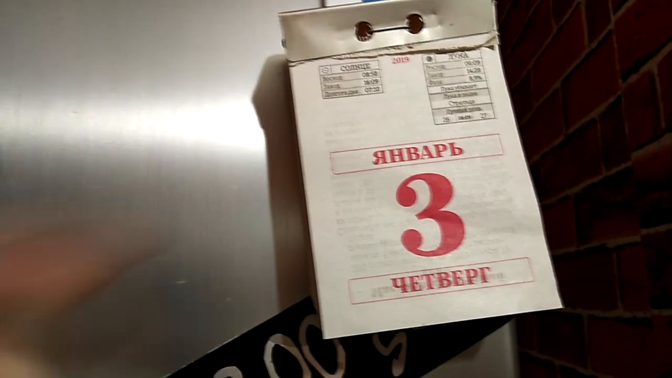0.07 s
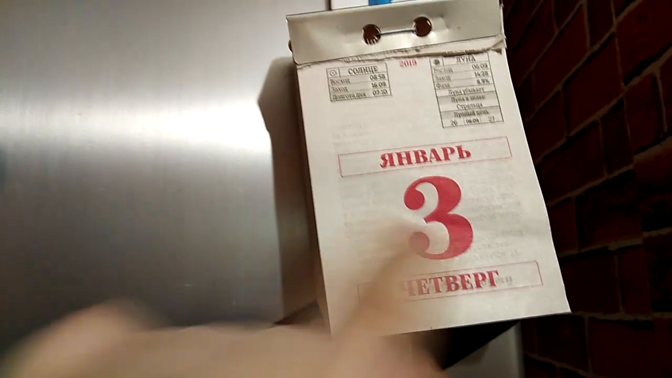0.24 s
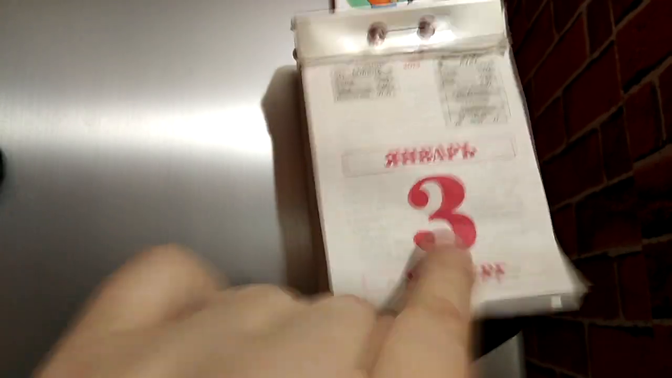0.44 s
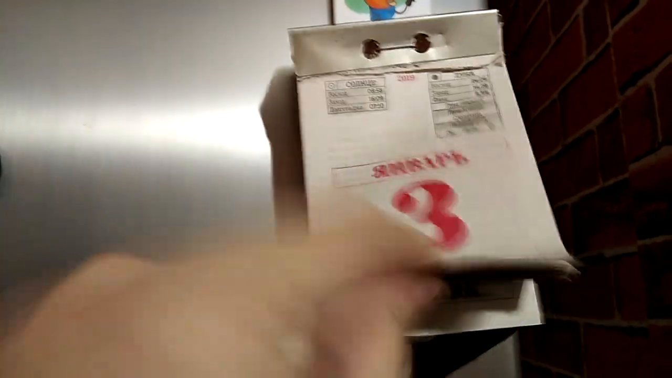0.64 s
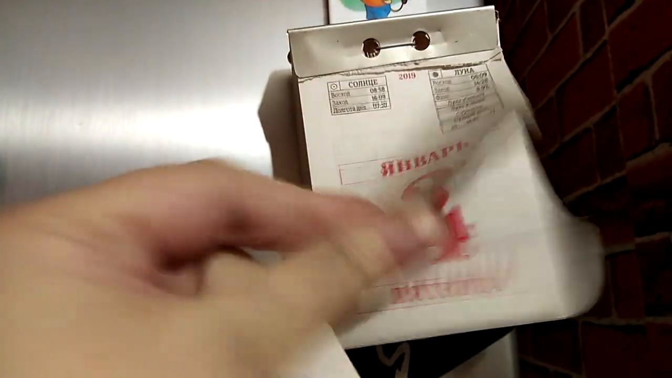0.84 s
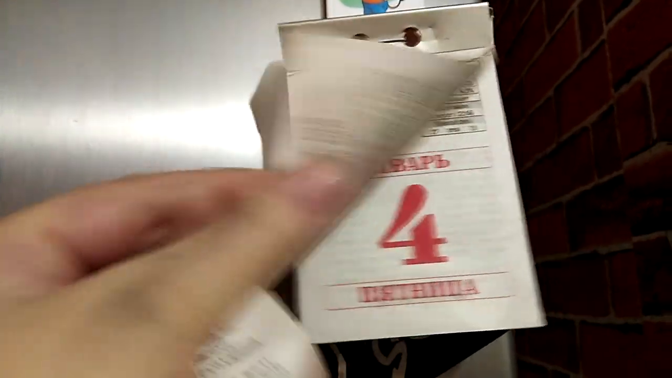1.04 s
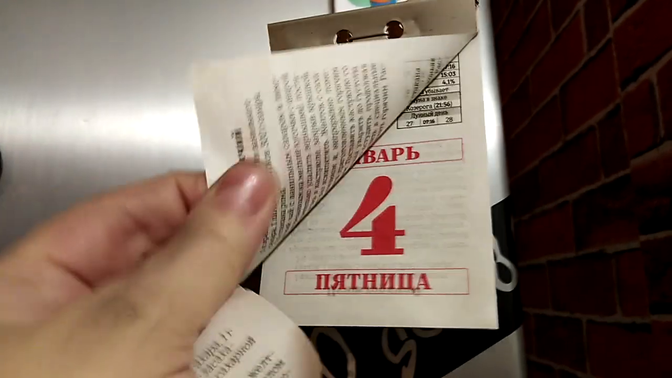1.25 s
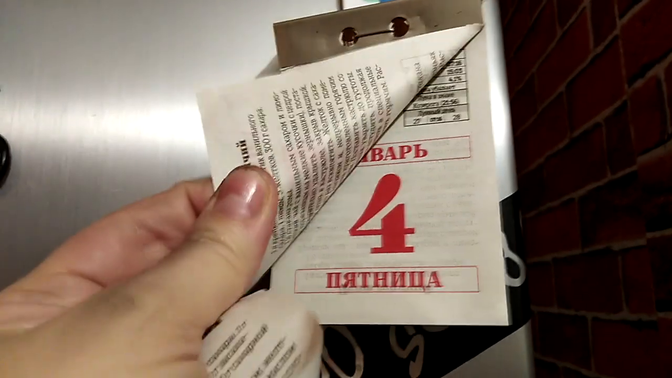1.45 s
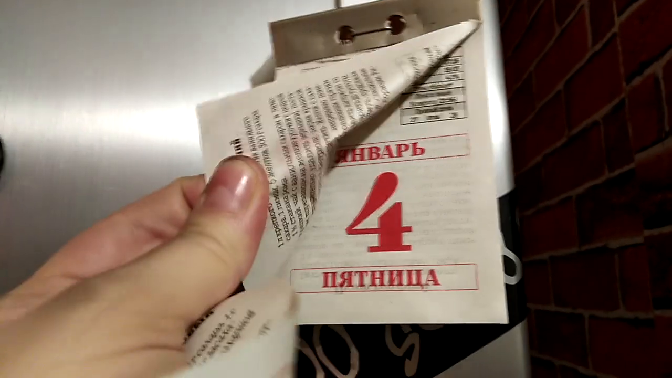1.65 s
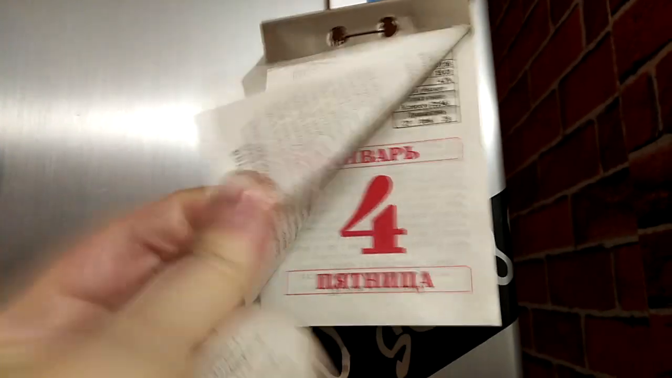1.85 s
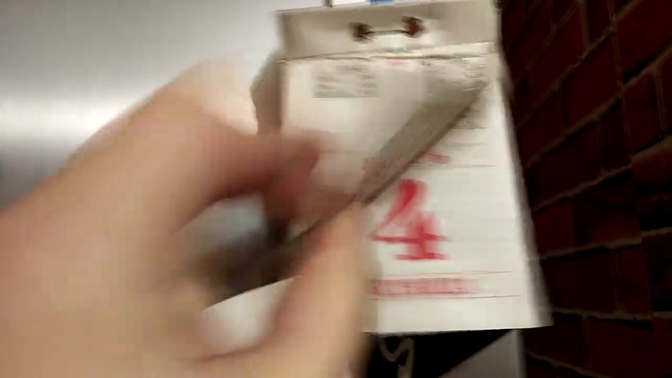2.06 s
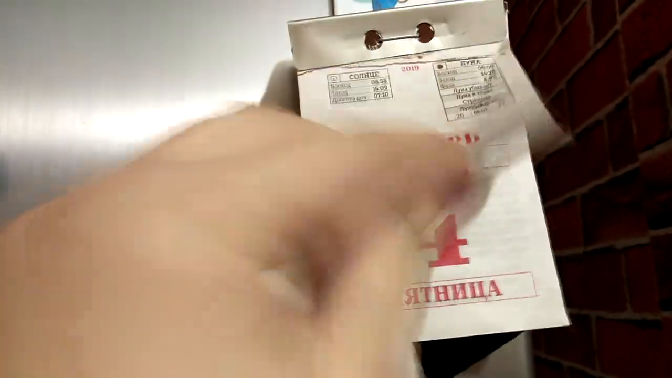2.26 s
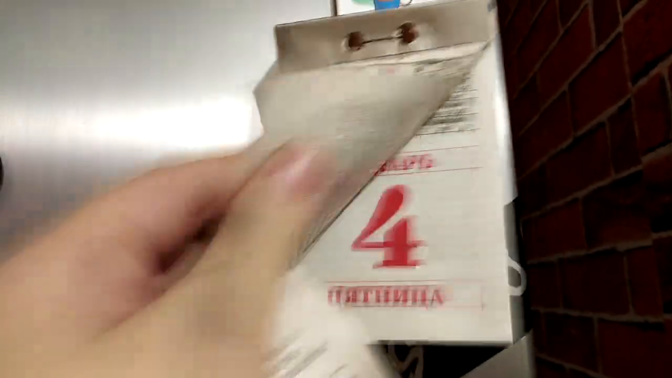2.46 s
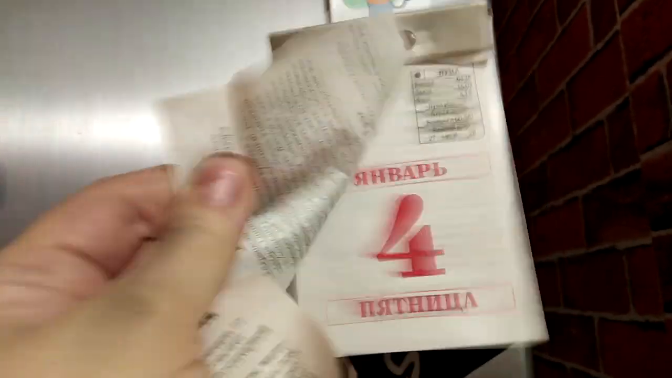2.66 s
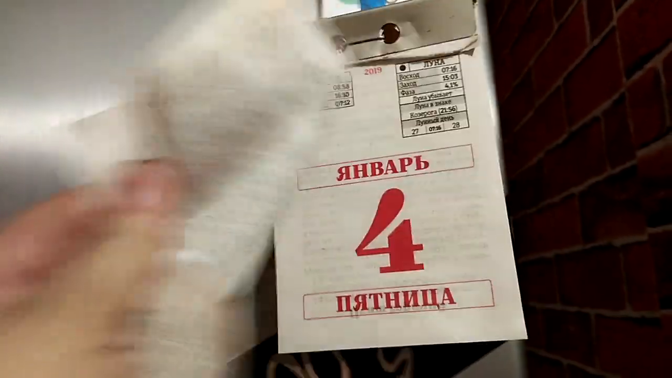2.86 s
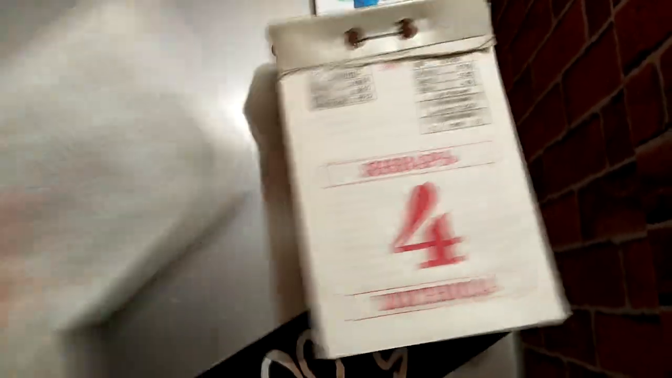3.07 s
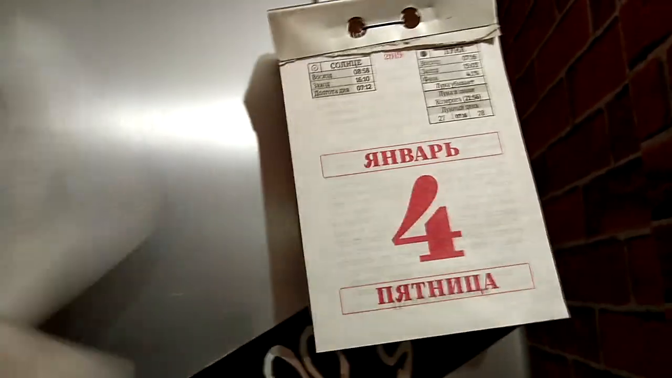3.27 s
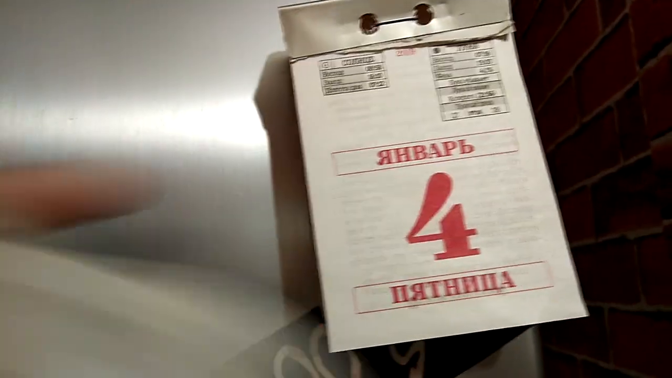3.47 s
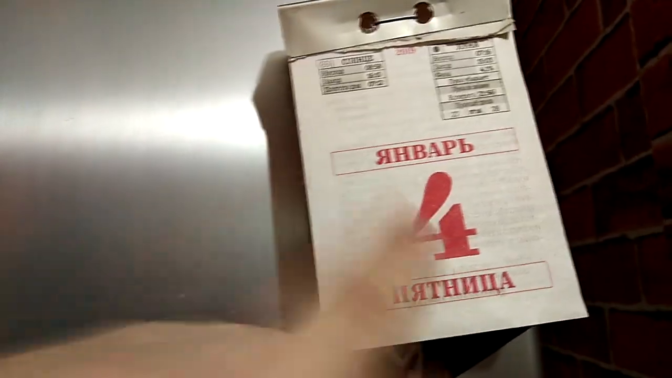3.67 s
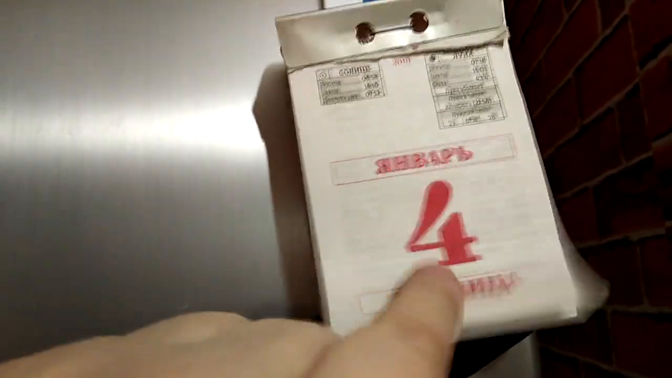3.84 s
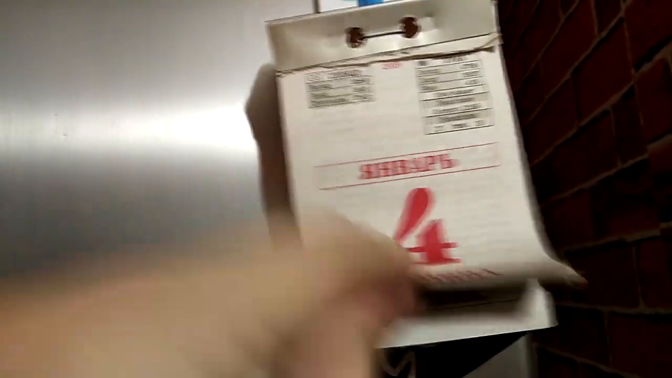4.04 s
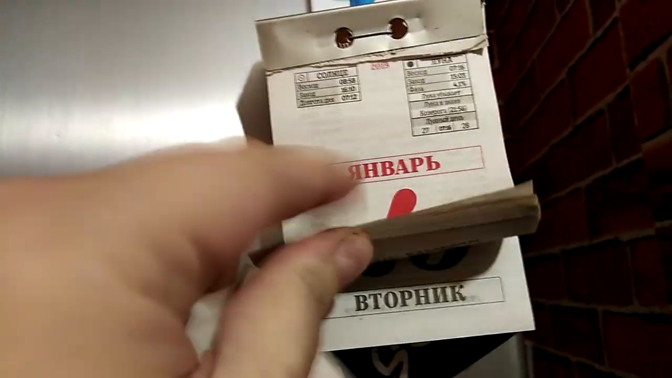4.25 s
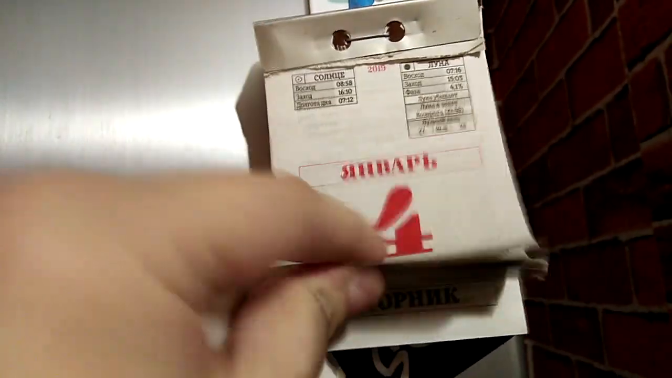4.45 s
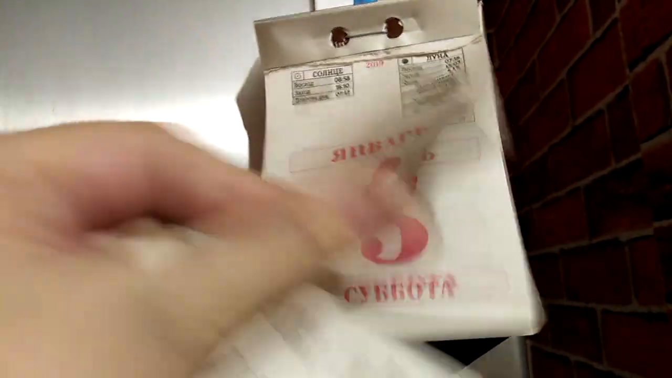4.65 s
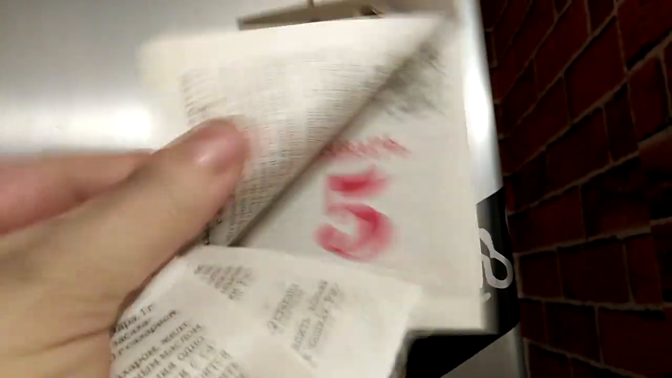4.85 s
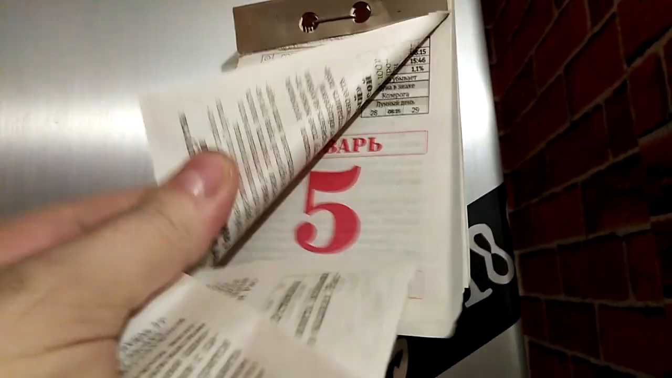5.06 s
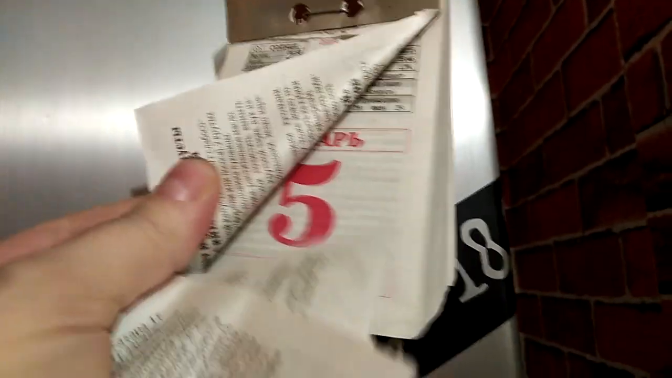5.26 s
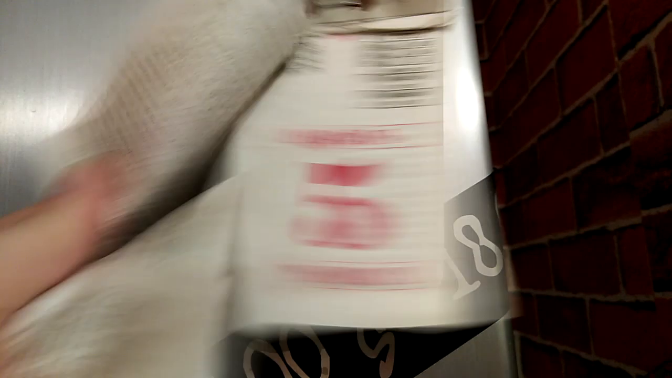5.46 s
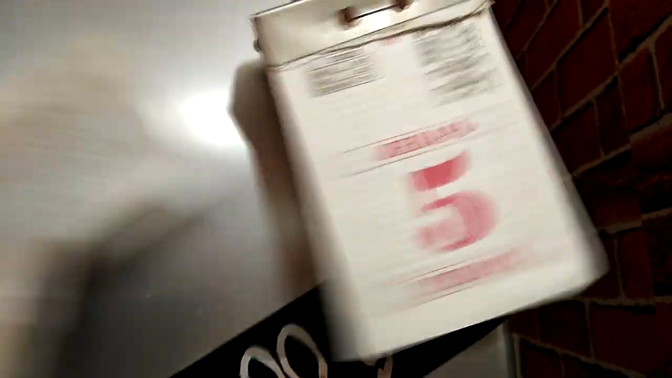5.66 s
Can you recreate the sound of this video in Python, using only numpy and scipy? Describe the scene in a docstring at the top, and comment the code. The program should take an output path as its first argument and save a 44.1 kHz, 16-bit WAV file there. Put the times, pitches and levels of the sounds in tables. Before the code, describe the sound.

A small tear-off calendar pad is handled very close to the microphone in a small, dry room. At 0 s a freed sheet flaps with a sharp snap, then fingers brush and scrape the paper until 0.9 s, with a soft low bump at 0.5 s. From 1 to 2.5 s come sparse grainy rubs and little crinkles, with brighter pops near 1.9 s. At 2.6 s a page rips abruptly, starting with a bright crack and thump and tearing on in crackling bursts to about 3.05 s. From 3.1 to 4 s the paper swishes and rustles; light rubs and ticks follow, then denser, louder rustling at 4.4-4.9 s with a dull bump. After a quieter moment, a second quick rip crackles at 5.35-5.55 s, followed by two short closing rubs to 5.7 s. A faint low metal-panel resonance follows the paper over very quiet bassy ambience.

```python
"""Close to the microphone in a small room, pages come off a small tear-off wall calendar.
A freed sheet flaps and snaps; then fingers rub over the pad (grainy noise) and bump it (low thuds).
From 2.6 s a page rips along the binding, fibre bundle by fibre bundle (bursts of tiny ruptures that shake
the loose sheet); rubbing and buckling snaps (ringing cracks) go on until a second rip at 5.4 s and
two last strokes. A steel panel hums along, over a faint ambience."""
import sys
import numpy as np
from scipy import signal
from scipy.fft import rfft, irfft, next_fast_len
from scipy.io import wavfile
from scipy.ndimage import uniform_filter1d, map_coordinates

SR = 44100
rng = np.random.default_rng(int(sys.argv[2]) if len(sys.argv) > 2 else 0)


def bounce(signal):
    """Save signal as a 16-bit WAV file at the path given by the first command-line argument."""
    frames = np.transpose(np.atleast_2d(signal))
    limited = np.clip(frames, -1, 1)
    pcm = np.round(limited * 32767).astype(np.int16)
    wavfile.write(sys.argv[1], SR, pcm)


N = 251934

# Strokes of fingers and sheets. Each row: start and end in seconds, relative level in dB,
# swell over the stroke in dB, pressure 0-1, grit 0-1.
STROKES = [(0, 0.095, -41, 4, 0.35, 0.67), (0.13, 0.234, -55.5, -12, 0.4, 0.9),
           (0.367, 0.469, -46, 8.5, 0.39, 0), (0.501, 0.563, -42, -8, 0.88, 0.98),
           (0.57, 0.859, -40.5, -7.5, 0.52, 0.47), (0.9, 0.971, -45.5, -1, 0.14, 0.79),
           (0.995, 1.032, -43, 8.5, 0.45, 0), (1.174, 1.246, -44.5, 2, 0, .1),
           (1.288, 1.332, -43, 10, 0.65, 0.55), (1.438, 1.511, -46.5, -7, 0.62, 0.6),
           (1.539, 1.661, -53, -19.5, 0.95, 0.83), (1.842, 1.878, -41.5, -13, 0.81, 0.99),
           (1.953, 2.101, -38, 7, 0.36, 0.72), (2.13, 2.163, -43.5, -0.5, 0.75, 0.5),
           (2.183, 2.262, -36.5, 3.5, 0.07, 0.48), (2.285, 2.503, -53, -31, 0.79, 0.84),
           (2.485, 2.619, -41.5, 3.5, 0.73, 0), (2.689, 2.764, -35, -8, 0.86, 0.93),
           (3.121, 3.249, -40.5, -6.5, 0.44, 0.78), (3.255, 3.363, -39, -4.5, 0.55, 0.3),
           (3.37, 3.46, -35.5, -11.5, 0.3, 0.36), (3.47, 3.565, -48.5, 7, 0.6, 1),
           (3.6, 3.7, -36.5, 11, 0.5, 0.8), (3.725, 3.876, -40, 4, 0.45, 0.64),
           (3.862, 3.988, -51, -7, 0.46, 0.38), (3.992, 4.061, -41, 1, 0.66, 0),
           (4.153, 4.192, -41.5, 14.5, 0.99, 0.9), (4.208, 4.305, -53.5, -2, 0, 0.3),
           (4.395, 4.519, -37.5, 0.5, 0.54, 0.3), (4.521, 4.643, -34, 5, 0.28, 0.79),
           (4.692, 4.777, -35.5, 9, 0.4, 0.7), (4.816, 4.864, -36.5, 8.5, 0.64, 0.54),
           (4.894, 4.957, -46, -24, 0.62, 0.9), (4.989, 5.157, -46.5, -12.5, 0.43, 0.96),
           (5.248, 5.299, -45.5, 12, 0.32, 1), (5.546, 5.613, -36.5, -7, 0.58, 0.7),
           (5.644, 5.708, -42, -1.5, 0.3, 0.99)]


def amp(db):
    """Decibels to gain."""
    return 10 ** (np.asarray(db) / 20)


def unit(x):
    """Scale to rms 1."""
    return x / np.sqrt(np.mean(x ** 2) + 1e-20)


def along(points, hz):
    """(Hz, value) points read on a log frequency axis."""
    f, v = np.transpose(points)
    return np.interp(np.log(hz + 1), np.log(f), v)


def wobble(rate):
    """A smooth random curve, rate knots a second."""
    knots = rng.standard_normal(int(N * rate / SR) + 4)
    return map_coordinates(knots, [np.arange(N) * rate / SR])


def filtered(x, response):
    """x times a response of frequency."""
    n = x.shape[-1]
    padded = next_fast_len(n + 2048)
    hz = np.fft.rfftfreq(padded, 1 / SR)
    return irfft(rfft(x, padded) * response(hz), padded)[..., :n]


def colour(x, points):
    """x through a (Hz, dB) spectrum, at rms 1."""
    return unit(filtered(x, lambda hz: amp(along(points, hz))))


def ring(x, modes):
    """x through (Hz, width in Hz, dB) resonances, at rms 1."""
    def response(f):
        return sum(amp(db) * 1j * f * width / (centre ** 2 - f * f + 1j * f * width)
                   for centre, width, db in modes)
    return unit(filtered(x, response))


def noise(n):
    """White noise at the two ports, whose likeness depends on frequency: greatest in the bass."""
    # How alike the ports hear it. Each row: frequency in Hz, correlation 0-1.
    likeness = [(100, 0.73), (400, 0.88), (1300, 0.61), (2500, 0.26), (4000, 0.057), (7000, 0.17),
                (14000, 0.4)]

    def mid_and_side(hz):
        turn = np.arccos(np.clip(along(likeness, hz), -1, 1)) / 2
        return np.array([np.cos(turn), np.sin(turn)])

    mid, side = filtered(rng.standard_normal((2, n)), mid_and_side)
    return np.array([mid + side, mid - side])


def grains(rate, spread_db, life):
    """Envelope of tiny ruptures, rate a second: sudden rise, quick fall of power over life s, uneven sizes."""
    size = amp(spread_db * np.clip(rng.standard_normal(N), -2, 2))
    struck = (rng.random(N) < rate / SR) * size ** 2
    power = signal.lfilter([1], [1, -np.exp(-1 / (life * SR))], struck)
    # tension released by one rupture is missing from its neighbours
    supply = np.abs(uniform_filter1d(power, size=1100)) + power.mean() / 10
    return unit(np.sqrt(power / supply))


def add(track, s, sound):
    """Mix a sound in at time s."""
    span = track[:, max(0, round(s * SR)):][:, :sound.shape[-1]]
    span += sound[:, :span.shape[-1]]


def bent(x, depth_db):
    """As the sheet bends, the frequencies it favours keep shifting."""
    bends_per_s = 22
    hz, t, z = signal.stft(x, SR, nperseg=256)
    knots = np.clip(rng.standard_normal((32, int(t[-1] * bends_per_s) + 2)), -2, 2)
    band = 7 * np.log2(1 + hz / 1200)  # finer steps in the bass
    field = map_coordinates(knots, np.meshgrid(band, t * bends_per_s, indexing='ij'))
    return signal.istft(z * amp(depth_db * field), SR, nperseg=256)[1][:, :x.shape[-1]]


def sliding():
    """Pressure sets the colour of a stroke; smooth ones hiss finely, gritty ones catch and let go."""
    # Spectra of the three voices of rubbing. Each row: frequency in Hz, relative level in dB.
    hiss_spectrum = [(1500, -13), (3200, -8), (4600, -8), (5700, -2), (7200, -2.5), (8600, -7.5),
                     (10800, -5.5), (12500, -9.5), (14500, -17.5)]
    rustle_spectrum = [(600, -18.5), (1300, 4), (1750, 4.5), (2250, 7.5), (3000, 0.5), (3700, 0),
                       (4600, 0.5), (7000, -27)]
    scrape_spectrum = [(35, -32.5), (90, 1.5), (250, -7), (420, -15), (650, -6.5), (900, 2.5), (1400, -4),
                       (2200, -10), (5000, -42)]
    # A light touch only hisses, a firm one rustles, a hard one scrapes the pad.
    # Each row: pressure 0-1, then hiss, rustle and scrape, relative levels in dB.
    touch = [(0, -2.5, -15.5, -25), (.6, -6, -2, -15), (1, -14, -15, 0)]
    # Pitch of the rustle over time. Each row: time in seconds, ratio to its usual spectrum.
    rustle_pitch = [(.45, 0.98), (.6, 1.36), (1.48, 1.7), (1.6, 0.78), (1.999, 1.35), (3.4, 1), (3.7, 0.86),
                    (4.1, 1.06), (4.45, 1.44), (4.74, 1.5), (4.84, 1.05)]
    attack_s, release_s = 0.015, 0.0061  # the fall straddles the end and lasts 1.5 release_s

    out, t = np.zeros((2, N)), np.arange(N) / SR
    fine = grains(rate=2400, spread_db=-2.5, life=0.00065)
    catches = grains(rate=240, spread_db=9.5, life=0.0018)
    hissing, scraping = colour(noise(N), hiss_spectrum), colour(noise(N), scrape_spectrum)
    rustling = noise(N)
    creaks = grains(rate=150, spread_db=5.5, life=.0014)
    waver_db = 1 * wobble(rate=35)  # the hand never moves quite evenly
    pressures, hiss_db, rustle_db, scrape_db = np.transpose(touch)
    for start, end, db, swell_db, pressure, grit in STROKES:
        edges = [start - attack_s / 2, start + attack_s / 2, end - release_s / 2, end + release_s]
        on = slice(max(0, int(edges[0] * SR)), int(edges[-1] * SR))
        progress = (t[on] - start) / (end - start)
        level_db = db + swell_db * (progress - .5) + waver_db[on]
        speed = np.interp(t[on], edges, [0, 1, 1, 0]) * amp(level_db)
        share = np.clip(grit, 0, 1) ** 2
        friction = np.sqrt((1 - share) * fine[on] ** 2 + share * catches[on] ** 2)
        ratio = np.interp((start + end) / 2, *np.transpose(rustle_pitch))
        shifted = [(hz * ratio, v) for hz, v in rustle_spectrum]
        hiss = amp(np.interp(pressure, pressures, hiss_db)) * hissing[:, on]
        rustle = amp(np.interp(pressure, pressures, rustle_db)) * colour(rustling[:, on], shifted)
        scrape = amp(np.interp(pressure, pressures, scrape_db)) * scraping[:, on]
        body = rustle * (0.66 + 0.12 * creaks[on]) + scrape * creaks[on]
        out[:, on] += speed * friction * (hiss + body)
    return bent(out, depth_db=2.5)


def ripping():
    """Each tug bites at once and fades as paper yields; bursts of parting fibres shake loose sheet and pad."""
    # Pulls at the binding, the weakest mostly a freed sheet flapping. Each row: start and end in seconds,
    # fibres, loose sheet and pad, relative levels in dB, fade in dB, lowest ring in Hz.
    tugs = [(0, 0.071, -31, -26.5, -52, 23, 2370), (2.626, 2.681, -7.5, -26, -20, 20, 2100),
            (2.781, 2.831, -27.5, -31.5, -26.5, 1.5, 1700), (2.833, 2.949, -27.5, -36.5, -30, -4, 1720),
            (2.958, 3.031, -13.5, -22, -26.5, 7.5, 1620), (5.359, 5.38, -11, -26, -26.5, 8, 1700),
            (5.387, 5.41, -18, -28, -39, -4, 1700), (5.412, 5.466, -12, -18, -26.5, 4, 1650),
            (5.471, 5.535, -18.5, -18, -33.5, 5.5, 2220)]
    # Spectra of parting fibres and of the pad. Each row: frequency in Hz, relative level in dB.
    fibre_spectrum = [(1200, -28), (3000, 3.5), (4800, 3.5), (5900, 11.5), (7800, 9), (8800, 6),
                      (9600, 11.5), (11000, 11.5), (12000, 8.5), (14500, 2.5)]
    pad_spectrum = [(35, -39.5), (80, -6), (160, -3.5), (330, 0), (520, -6.5), (1000, 4.5), (1450, -2.5),
                    (2100, -2.5), (4000, -47)]
    # Upper rings of the loose sheet. Each row: frequency in Hz, width in Hz, relative level in dB.
    sheet_modes = [(2800, 700, -6), (3350, 550, -1), (3900, 700, -5)]
    attack_s, release_s = 0.001, 0.0032
    sheet_fades, pad_fades = 0.69, 0.67  # shares of the fibres' fade

    out, t = np.zeros((2, N)), np.arange(N) / SR
    singly = grains(rate=240, spread_db=6.5, life=.0008)
    crowded = grains(rate=2000, spread_db=4, life=.0005)
    rupture = bent(noise(N), depth_db=2.5)
    uneven = amp(1.5 * wobble(rate=70))  # the tear sticks and runs
    for start, end, fibre_db, sheet_db, pad_db, fade_db, hz in tugs:
        on = (t >= start) & (t < end + 10 * release_s)
        bite = np.minimum((t[on] - start) / attack_s, 1)
        pull = bite * np.exp(-np.maximum(t[on] - end, 0) / release_s)
        progress = np.minimum((t[on] - start) / (end - start), 1)
        lost_db = fade_db * progress
        fibre = amp(fibre_db - lost_db)
        # the harder the pull, the closer together the bundles part
        hard = .15 + .7 * fibre / (fibre + amp(-22))
        bursts = np.sqrt((1 - hard) * singly[on] ** 2 + hard * crowded[on] ** 2)
        breaks = bursts * rupture[:, on]
        # the sheet's lowest ring is stronger the higher it lies
        low_db = -4.5 + 0.0029 * (hz - 1700)
        low = amp(low_db) * ring(breaks, [(hz, .2 * hz, 0)])
        sheet = amp(sheet_db - sheet_fades * lost_db) * (low + ring(breaks, sheet_modes))
        pad = amp(pad_db - pad_fades * lost_db) * colour(breaks, pad_spectrum)
        parting = amp(-2.5) * fibre * colour(breaks, fibre_spectrum)
        out[:, on] += pull * uneven[on] * (parting + amp(-5.0) * sheet + amp(-6) * pad)
    return out


def room(x):
    """The room's answer, a decaying noise tail redrawn three times a second as hand and sheet move about."""
    # Decay of the room. Each row: frequency in Hz, time to fall by 60 dB in seconds.
    decay = [(120, 0.27), (260, 0.86), (450, 0.12), (1000, 0.21), (3000, 0.16), (8000, 0.15),
             (14000, 0.097)]
    out, hop = np.zeros((2, N)), SR // 3
    for start in range(0, N, hop):
        hz, t, z = signal.stft(noise(SR // 2), SR, nperseg=256)
        fall = amp(-60 * t / along(decay, hz)[:, None])
        build_up = 1 - np.exp(-t / 0.00043)
        tail = signal.istft(z * fall * build_up, SR, nperseg=256)[1]
        tail = tail / np.linalg.norm(tail[0])
        add(out, start / SR, signal.fftconvolve(x[:1, start:start + hop], tail, axes=1))
    return out


def panel_hum(paper):
    """The steel panel behind the pad resonates with the sounds of the paper."""
    # Resonances of the panel. Each row: frequency in Hz, width in Hz, relative level in dB.
    panel_modes = [(91, 39, -3), (148, 40, -9), (211, 42, -7.5), (250.4, 9.9, 6), (312, 10, -32.5),
                   (512, 15, 1.5)]
    return amp(-52.5) * ring(paper, panel_modes)


def ambience():
    """The faint steady noise of the place, strongest in the bass."""
    # Spectrum of the place. Each row: frequency in Hz, relative level in dB.
    ambience_spectrum = [(25, -15.5), (50, 16), (100, 10.5), (260, -0.5), (450, -44), (1500, -46),
                         (6000, -21), (15000, -17)]
    return amp(-66) * colour(noise(N), ambience_spectrum)


def scatter(start, end, per_s, over_db, hz, crisp_db, db=0, change_db=0, density=1):
    """Rows of up to 16 chance snaps, over_db above a level that runs from db to db + change_db."""
    spread_db, spread_octaves = 1.5, 0.94
    places, draws = rng.random(16), np.clip(rng.standard_normal((16, 2)), -2, 2)
    count = max(0, round(density * per_s * (end - start)))
    rows = []
    for u, (size, pitch) in zip(places[:count], draws):
        level_db = db + u * change_db + over_db + spread_db * size
        rows.append((start + u * (end - start), level_db, hz * 2 ** (spread_octaves * pitch), crisp_db))
    return rows


def small_snaps():
    """The grittier a stroke, the more often it crinkles; in a tear, stronger fibre bundles pop at random."""
    # A page is parting along the binding. Each row: start and end in seconds.
    tears = [(2.782, 3.04), (5.369, 5.53)]
    rows = []
    for start, end, db, swell_db, _, grit in STROKES:
        rows += scatter(start, end, per_s=27.5, over_db=7.5, hz=1498, crisp_db=-13,
                        db=db - swell_db / 2, change_db=swell_db, density=grit ** 2)
    for start, end in tears:
        rows += scatter(start, end, per_s=50, over_db=-24, hz=2400, crisp_db=-6.5)
    return rows


def buckling():
    """A crease strains for an instant and pops through: a millisecond crack, then a short shiver of the sheet."""
    # The sheet buckles or a strong fibre bundle gives way. Each row: time in seconds,
    # relative level in dB, ring in Hz, relative crispness in dB.
    snap_rows = [(0.015, -7, 2670, 2), (.019, -16, 2500, -26), (.165, -15, 2290, -7),
                 (0.229, -32.5, 2700, -17), (0.329, -40.5, 3450, -2), (0.509, -29.5, 880, 1),
                 (0.512, -14.5, 2340, -34), (0.69, -22, 2740, -45), (.694, -26.5, 2770, -43),
                 (0.767, -14, 2960, -5.5), (0.783, -22, 2800, -33), (1.09, -13, 2750, -7.5),
                 (1.261, -30.5, 1210, -10), (1.285, -22.5, 1085, -7.5), (1.33, -25.5, 1140, -30),
                 (1.381, -29, 1160, -15), (1.426, -16, 3300, -19.5), (1.504, -34.5, 750, -35),
                 (1.522, -16.5, 1275, -16), (1.572, -33.5, 844, -32), (1.584, -32.5, 1150, -30),
                 (1.595, -33.5, 1400, -19), (1.609, -42, 950, -30), (1.64, -33.5, 1000, -27),
                 (1.712, -34.5, 890, -16.5), (1.727, -35.5, 1170, -35.5), (1.815, -38.5, 1210, -42),
                 (1.852, -13, 3540, -16), (1.898, -3, 3300, -11.5), (2.055, -11.5, 1010, -2.5),
                 (2.281, -12.5, 4100, -10), (2.488, -27.5, 1010, -36), (2.628, -5, 5120, -7),
                 (2.63, -5.5, 1280, -1.5), (2.712, -21, 2400, -2), (2.723, -10.5, 1260, 1.5),
                 (2.741, -16, 3600, -8), (2.76, -23, 4000, 2), (2.785, -14, 3700, 4.5),
                 (2.791, -17, 3600, 0.5), (2.799, -25, 1730, -5.5), (2.833, -14, 1380, -12.5),
                 (2.852, -14, 1700, -5), (2.871, -13.5, 1700, 1), (2.885, -12, 1670, -3),
                 (2.953, -3.5, 2300, 0), (3.006, -11.5, 1940, -12), (3.041, -11.5, 1730, -9),
                 (3.173, -12, 2760, -5.5), (3.229, -18.5, 2630, -8.5), (3.352, -21, 2090, -13),
                 (3.39, -15, 2320, -11.5), (3.458, -14, 2430, 0.5), (3.55, -24, 3180, -21),
                 (3.631, -20, 1620, -8.5), (3.688, -11.5, 970, -6), (3.8, -20, 3600, -4),
                 (4.078, -25, 1250, -35), (4.097, -23.5, 2620, -7.5), (4.137, -24.5, 1000, -28),
                 (4.17, -27, 2600, -10), (4.185, -14, 2800, -16.5), (4.302, -13.5, 1400, -15.5),
                 (4.525, -17.5, 2510, -28), (4.552, -11.5, 2140, 1), (4.572, -15.5, 4240, -1),
                 (4.612, -15, 905, 1), (4.623, -17, 3580, 4), (4.646, -21, 3570, 6),
                 (4.728, -22.5, 4000, 4), (4.776, -17, 3400, 0.5), (4.894, -20.5, 635, -18),
                 (5.076, -18.5, 5150, -1.5), (5.168, -21.5, 3120, -8), (5.289, -31.5, 4250, -23),
                 (5.341, -16, 4520, -12.5), (5.35, -15.5, 3130, -18), (5.361, -7, 3350, -9),
                 (5.374, -8.5, 3400, -8), (5.405, -7, 3380, -4), (5.472, -10, 2360, -10.5),
                 (5.481, -10.5, 2400, -7), (5.488, -16.5, 2270, -12), (5.506, -12, 2240, -6),
                 (5.521, -15.5, 3100, -3), (5.564, -20, 2100, -23), (5.587, -13, 2490, -31)]
    # Spectra of the crease, its crisp top and the body of the sheet.
    # Each row: frequency in Hz, relative level in dB.
    crease_spectrum = [(100, -13), (500, -19.5), (1200, 8), (3000, 5.5), (6000, 1), (10000, -15),
                       (15000, -32.5)]
    crisp_spectrum = [(2000, -117), (5000, 9), (7500, 9.5), (10500, 9), (14500, 1)]
    body_spectrum = [(40, -39), (150, -11.5), (400, -8), (900, 1), (1400, -8), (3000, -43)]
    strain_s, crack_s, shiver_s = 0.00081, 0.00084, 0.005  # time constants of rise, fall and after-ring

    out, t = np.zeros((2, N)), np.arange(-200, 1300) / SR
    after = np.maximum(t - strain_s, 0)
    strain = np.exp(np.minimum(t - strain_s, 0) / strain_s)
    shape = strain * (np.exp(-after / crack_s) + amp(-9.5) * np.exp(-after / shiver_s))
    shiver = noise(N + 2 * len(t))
    for s, db, hz, crisp_db in snap_rows + small_snaps():
        # a wide, low-ringing fold moves more of the sheet: 1 dB more body per octave down
        body_db = -10.5 - 1 * np.log2(hz / 2510)
        crack = shiver[:, max(0, round(s * SR)):][:, :len(t)] * shape
        fold = ring(crack, [(hz, .36 * hz, 0)])
        snap = colour(crack, crease_spectrum) + amp(1.5) * fold
        snap += amp(crisp_db + 9.5) * colour(crack, crisp_spectrum)
        snap += amp(body_db) * colour(crack, body_spectrum)
        add(out, s + t[0], amp(db - 19.0) * unit(snap))
    return out


def bumping():
    """The hand bumps the pad on the panel: the soft stack of pages gives a short, broad thud."""
    # Bumps of the hand. Each row: time in seconds, relative level in dB, pitch in Hz.
    bump_rows = [(.511, -30, 137), (0.538, -43, 126), (1.26, -42, 132), (1.285, -40, 158),
                 (2.101, -38.5, 372), (2.205, -39.5, 93), (2.497, -39, 157), (2.626, -25, 373),
                 (2.833, -29.5, 280), (3.395, -45.5, 102), (3.61, -43, 209), (3.894, -41.5, 175),
                 (4.086, -39, 230), (4.167, -48, 168), (4.545, -35.5, 94.7), (4.768, -44.5, 253),
                 (4.892, -38, 130), (5.167, -37.5, 101), (5.357, -31, 150), (5.537, -54, 91.5)]
    # Spectrum of the stack of pages. Each row: frequency in Hz, relative level in dB.
    thud_spectrum = [(30, -20), (70, -4), (140, 1), (220, -4.5), (400, -3.5), (700, 2.5), (1500, -12)]
    out, t = np.zeros((2, N)), np.arange(4096) / SR
    shape = (1 - np.exp(-t / .004)) * np.exp(-t / .01)
    for s, db, hz in bump_rows:
        knock = ring(noise(len(t)) * shape, [(hz, .75 * hz, 0)])
        add(out, s, amp(db - 15.5) * colour(knock, thud_spectrum))
    return out


def scene():
    """The paper lies right of centre: the left port hears it later and duller at the top."""
    # Where the paper lies. Each row: time in seconds, left minus right in dB.
    place = [(0.0, -2.5), (0.89, -3), (1.1, -7), (1.129, -3), (1.88, -1.5), (1.91, 0), (3.37, -5),
             (3.53, -7.5), (3.7, 1.5), (4.12, -3), (4.36, -2), (4.39, -7.5), (4.58, -4.5), (5.71, -3)]
    # Tilt of the paper between the ports. Each row: frequency in Hz, left minus right in dB.
    lean = [(60, -2), (200, 2.5), (700, -2.5), (1290, 4), (2380, 0), (4400, -3.5), (6500, 4.5), (9500, -11),
            (14000, -8.5)]
    port_lag_s = 0.0002705

    handling, snaps = sliding() + ripping() + bumping(), buckling()
    paper = handling + snaps
    panel = panel_hum(paper)
    sides = np.array([[1], [-1]]) / 2  # left, right: half of each difference
    place_db = np.interp(np.arange(N) / SR, *np.transpose(place))
    answer = room(amp(-8.5) * handling + amp(-9) * snaps)
    heard = (paper + answer) * amp(sides * place_db)

    def port_response(hz):
        lag = np.exp(-2j * np.pi * hz * port_lag_s * sides)
        return amp(sides * along(lean, hz)) * lag

    return filtered(heard, port_response) + panel + ambience()


def record(dry):
    """The small microphone loses the deepest bass, rounds off the loudest cracks and ends steeply at the top."""
    top_hz = 14350
    thin = filtered(dry, lambda hz: (1j * hz / (28 + 1j * hz)) ** 2)
    rounded = thin / (1 + np.abs(thin / .92) ** 6) ** (1 / 6)
    return filtered(rounded, lambda hz: 1 / np.sqrt(1 + (hz / top_hz) ** 160))


dry = scene()
out = record(dry)
bounce(out)
```